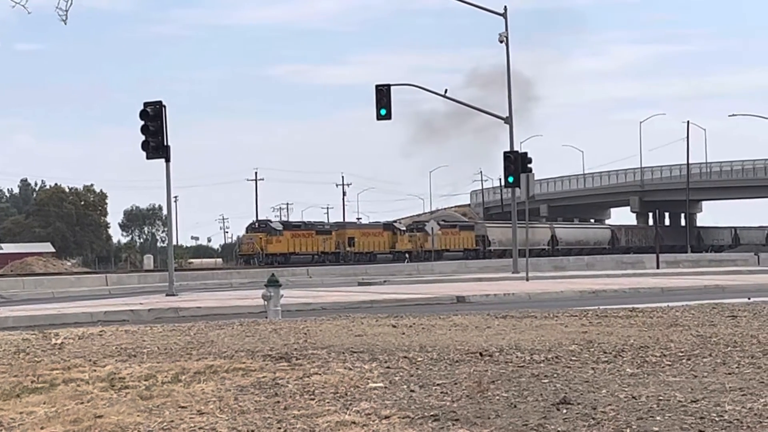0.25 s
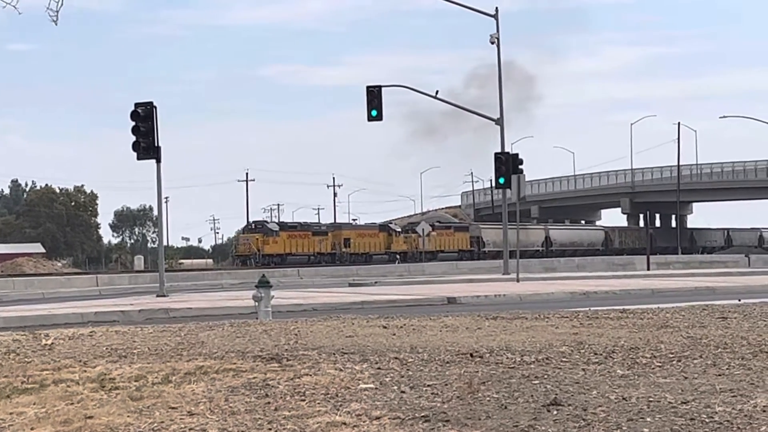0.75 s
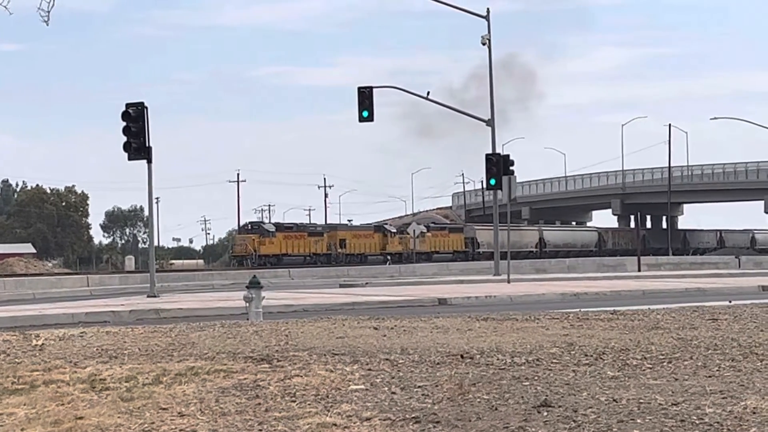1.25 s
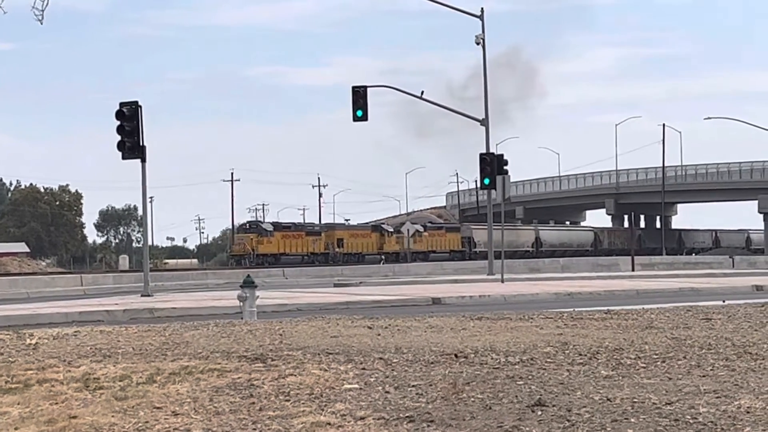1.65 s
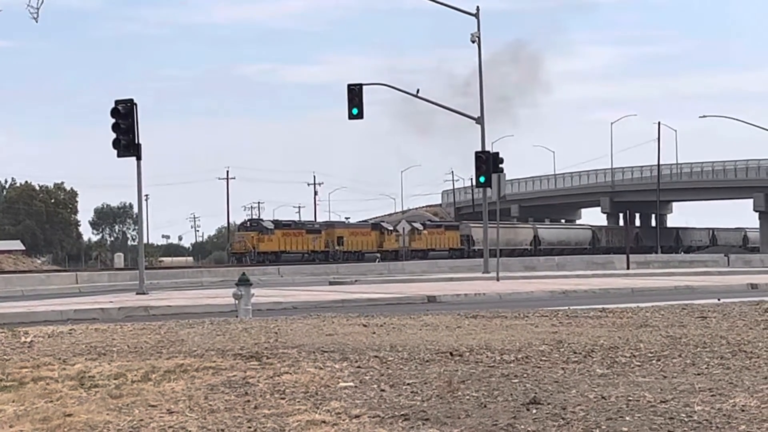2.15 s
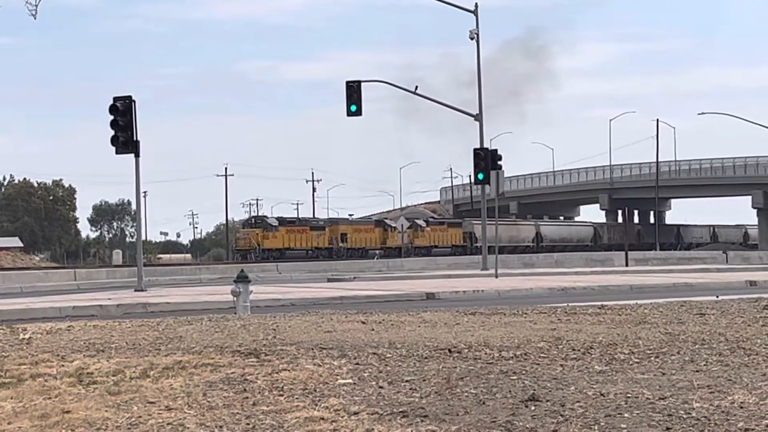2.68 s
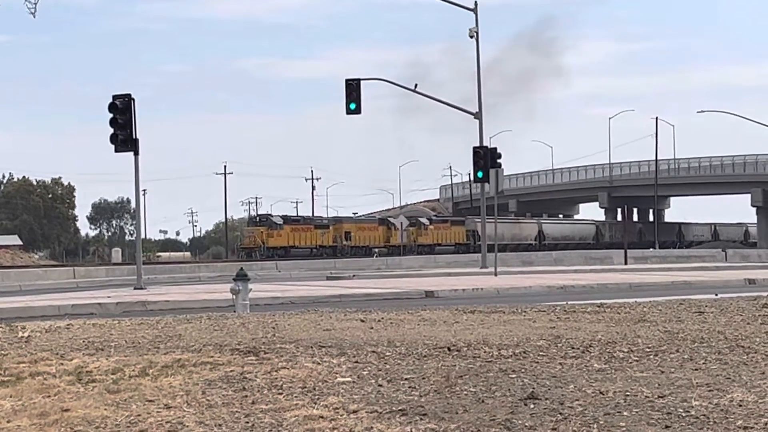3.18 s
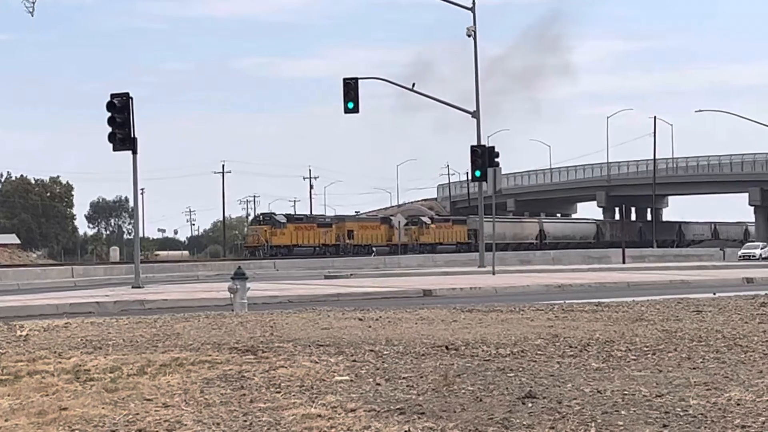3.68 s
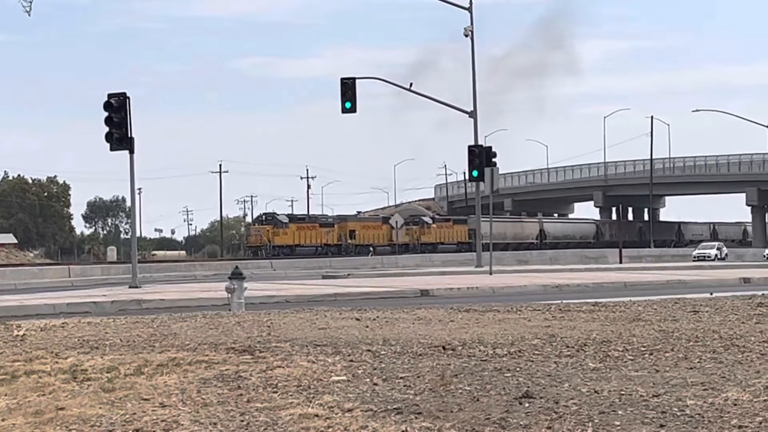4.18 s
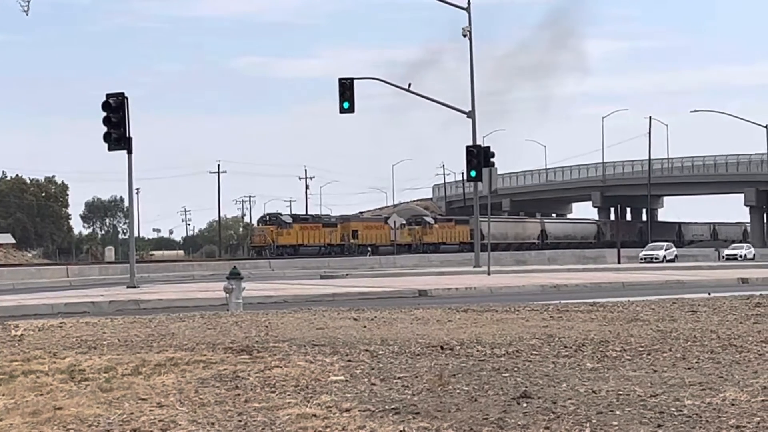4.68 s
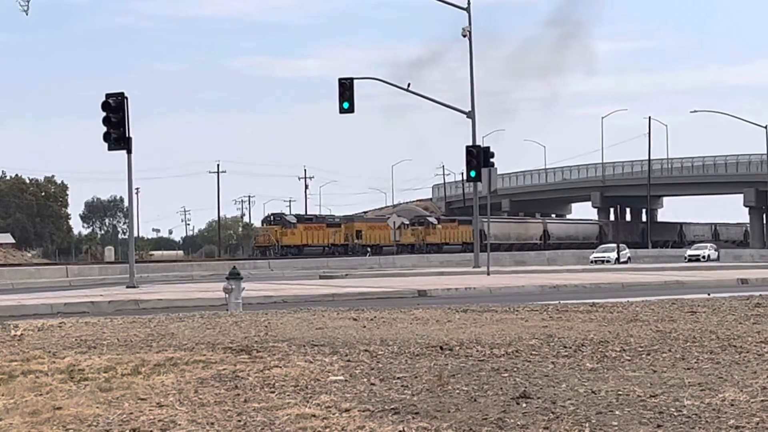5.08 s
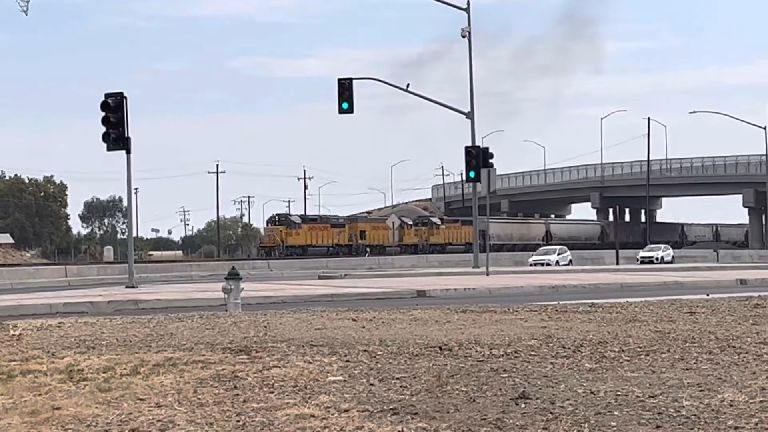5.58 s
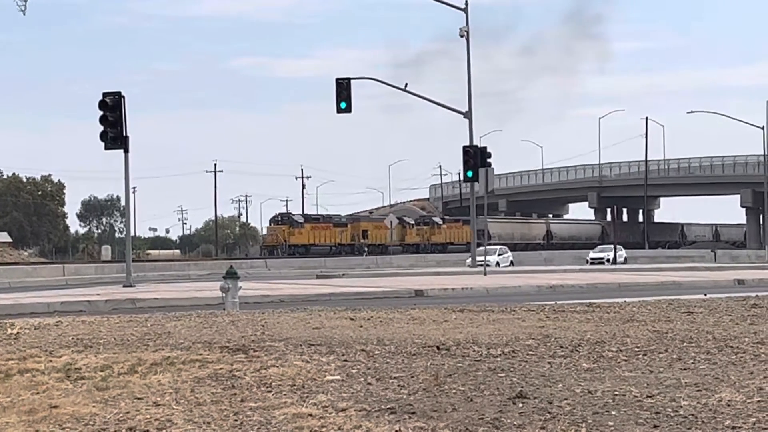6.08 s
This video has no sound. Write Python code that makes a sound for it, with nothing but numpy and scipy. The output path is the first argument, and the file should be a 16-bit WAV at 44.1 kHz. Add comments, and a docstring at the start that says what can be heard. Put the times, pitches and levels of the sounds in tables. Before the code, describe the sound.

Heavy diesel engine rumbling and knocking steadily in open air, slowing and softening midway, then pulling again with a thin whistle and late squeak.

```python
"""A large diesel across a road pulls steadily, its exhaust throbbing once a crank turn and its block clattering.
From the start, noise makes the hiss of passing cars, and blurred tones make hums and whines.
Small ticks ring and dry snaps of noise sound within the first second, and a few more follow.
The engine slows and eases off, thin sliding tones whistle as it picks up again, and a squeak comes near the end.
A small two-port microphone stands in an open field."""
import sys
import numpy as np
from scipy import signal
from scipy.fft import rfft, irfft, next_fast_len
from scipy.io import wavfile
from scipy.ndimage import uniform_filter1d, map_coordinates

SR = 44100
rng = np.random.default_rng(int(sys.argv[2]) if len(sys.argv) > 2 else 0)


def pcm_store(signal):
    """Save signal as 16-bit PCM."""
    levels = np.round(np.clip(np.atleast_2d(signal), -1, 1) * 32767)
    wavfile.write(sys.argv[1], SR, levels.astype(np.int16).T)


N = 279990


def amp(db):
    """Turns a level in dB into a gain."""
    return 10 ** (np.asarray(db) / 20)


def unit(x):
    """Scales a signal to an rms of 1."""
    return x / np.sqrt(np.mean(x ** 2) + 1e-20)


def along(points, hz):
    """Reads a curve of (frequency, value) points, joined on a log frequency axis."""
    f, v = np.transpose(points)
    return np.interp(np.log(hz + 1), np.log(f + 1), v)


def curves(rows):
    """Gives one value per sample for each column after the time."""
    s, *cols = np.transpose(rows)
    return [np.interp(np.arange(N) / SR, s, c) for c in cols]


def wobble(rate):
    """Draws a smooth random curve through `rate` random points a second."""
    points = rng.standard_normal(int(N * rate / SR) + 4)
    return map_coordinates(points, [np.arange(N) * rate / SR])


def filtered(x, response):
    """Filters x by multiplying its spectrum by a complex response."""
    m = next_fast_len(N + 8192)
    spectrum = rfft(x, m) * response(np.fft.rfftfreq(m, 1 / SR))
    return irfft(spectrum, m)[..., :N]


def rush(spectrum, patchy_db, gate=1):
    """Makes stereo noise of rms 1 with patches of random gain, gated before it is coloured."""
    # likeness of left and right: (frequency [Hz], likeness [0-1])
    alike = [(60, .998), (190, .987), (320, .97), (490, .92), (710, .79), (950, .84), (1120, .74),
             (1420, .36), (1600, .2), (1800, .76), (2320, .93), (3200, .97), (3600, .999), (5000, .999),
             (5300, .9), (7500, .85)]
    z = signal.stft(rng.standard_normal((2, N)), nperseg=512)[2]
    field = rng.standard_normal(z.shape[1:])
    field = uniform_filter1d(field, size=5, axis=0)  # smooth over frequency
    field = uniform_filter1d(field, size=12, axis=1)  # smooth over time
    pair = gate * signal.istft(z * amp(patchy_db * unit(field)), nperseg=512)[1][:, :N]

    def mix(hz):
        angle = np.arccos(np.clip(along(alike, hz), -1, 1)) / 2
        return amp(along(spectrum, hz)) * [np.cos(angle), np.sin(angle)]

    mid, side = filtered(pair, mix)
    return unit(np.array([mid + side, mid - side]))


def staged(levels, fade=0):
    """Holds a level through each stage, joins them by ramps and sinks by `fade` dB per s at the end."""
    # pulling, straining, easing off, slack, picking up, settled: (from [s], to [s])
    # the last times run backwards: the settled level cuts in at the very last one, without a ramp
    stages = [(0, 0.82), (1.6, 2.08), (2.4, 3.03), (3.3, 3.52), (4.25, 5.3), (5.15, 5.03)]
    t = np.arange(N) / SR
    held = np.interp(t, np.ravel(stages), np.repeat(levels, 2))
    return held - fade * np.clip(t - stages[-1][1], 0, None)


def window(start, length, edge):
    """Rises, holds and falls; all three settings are in seconds."""
    t = np.arange(N) / SR - start
    return np.clip(np.minimum(t, length - t) / edge, 0, 1) ** 2


def beats(turns, places):
    """Makes short swells at fixed places in the crank turn, a little different every time."""
    total = 0
    for at, db in places:
        swell = np.exp(11 * (np.cos(2 * np.pi * (turns - at)) - 1))
        total = total + amp(db + 1.5 * wobble(11)) * swell
    return total


def exhaust(turns):
    """Adds tones at multiples of the crank speed that bunch up once a turn, which makes the throb."""
    # strong tones: (multiple of the crank speed, then level in each of the six stages [dB])
    strong = [(6, -30, -29.5, -39, -41, -33, -32.5), (7, -36.5, -34.5, -47, -49, -45, -45),
              (8, -36.5, -37.5, -41, -47, -44, -43), (9, -33.5, -30, -36.5, -39, -28.5, -31),
              (10, -31, -32.5, -35.5, -37, -37.5, -33.5), (11, -47, -43, -51, -55, -43, -43),
              (13, -44, -43.5, -50, -57, -50, -49), (15, -38, -50, -34, -45, -56, -56),
              (17, -44, -51, -49, -54, -41.5, -46), (18, -33, -31.5, -43, -43, -46, -42),
              (19, -40, -43, -48, -54, -43, -50)]
    # weak tones: (multiple of the crank speed, multiple it follows, level relative to that one [dB])
    weak = [(3, 6, -20), (12, 11, -3), (16, 17, -6), (20, 18, -13.5), (21, 17, -4.5), (23, 18, -17),
            (24, 18, -20), (25, 18, -19), (26, 18, -21), (28, 18, -22), (29, 18, -15), (30, 18, -19),
            (31, 18, -19), (32, 18, -23), (33, 18, -24), (34, 18, -23), (39, 18, -21), (44, 18, -22)]
    level = {int(round(k)): staged(db, fade=4) for k, *db in strong}
    for k, leader, db in weak:
        level[int(round(k))] = level[int(round(leader))] + db

    out = 0
    for k, db in level.items():
        # the phase rises in steps, and faster for the highest orders,
        # so their burst falls elsewhere in the turn
        phase = .45 + 1.05 * (k - 6) + .95 * (k > 8) + .95 * (k > 18)
        phase += np.pi * (k == 15)  # order 15 runs against the rest
        phase += -.9 * (10 < k < 15) + 1.75 * max(k - 22, 0)
        # moving air makes each order waver; the fainter ones drift further out of step
        drift_size = .2 if db.mean() > -44 else .6
        drift = .014 * k * wobble(7) + drift_size * wobble(1.2)
        gain = np.sqrt(2) * amp(db + .8 * wobble(6))
        out = out + gain * np.cos(2 * np.pi * k * turns + phase + drift)
    return out


def engine():
    """Adds exhaust tones, a low roar, block noise, and noise pulsed by the crank as knocks and clacks."""
    # crank speed: (time [s], speed [turns per s])
    speed = [(0, 11.082), (.32, 11.067), (1.198, 10.849), (2.152, 10.947), (2.678, 10.417), (3.537, 9.071),
             (3.895, 8.966), (5.152, 9.617), (6.35, 9.368)]
    # knocks in the block: (place in the turn [0-1], relative level [dB])
    knock_places = [(.05, -4.5), (.29, -11.5), (.41, -11.5), (0.721, -15), (0.917, -16)]
    # lower, ringing clacks: (place in the turn [0-1], relative level [dB])
    clack_places = [(.38, 0), (.77, -7)]
    # colour of the low roar: (frequency [Hz], relative level [dB])
    roar_colour = [(15, -48), (32, -8), (60, 0.5), (85, -3.5), (110, -2.5), (160, -5), (220, -6),
                   (275, -11), (325, -10), (390, -14), (500, -13.5), (700, -23.5), (1100, -31),
                   (2500, -86.5)]
    # colour of the block's noise: (frequency [Hz], relative level [dB])
    block_colour = [(350, -24), (600, 2.5), (700, -0.5), (790, 2), (1140, -2.5), (1240, -2), (1520, -2),
                    (1840, -4), (2110, -8), (2500, -8.5), (4160, -22), (5670, -29), (7500, -55),
                    (7750, -78)]
    # colour of a clack: (frequency [Hz], relative level [dB])
    clack_colour = [(500, -90), (900, -30), (1160, -15), (1228, 0), (1300, -13), (1450, -13), (1620, -22),
                    (1800, -8), (1920, -8), (2100, -26), (2500, -45), (3500, -120)]
    # colour of a knock: (frequency [Hz], relative level [dB])
    knock_colour = [(900, -5), (1900, -2.5), (2150, -6), (2500, 1.5), (2800, 0.5), (3100, -1), (4200, -5),
                    (5600, -13), (7500, -35.5), (7750, -67)]
    # roar: level in each stage [dB]
    roar_db = [-33, -31, -33.5, -34, -33.5, -33.5]
    # block noise: level in each stage [dB]
    block_db = [-41, -40, -45.5, -48, -47, -46.5]
    # clacks: level in each stage [dB]
    clack_db = [-49, -48.5, -60, -60, -55, -59]
    # strength of the knocks: (time [s], level [dB])
    knock_db = [(0, -45), (.7, -47), (1.2, -46), (1.6, -49.5), (2.1, -52.5), (2.6, -61), (3.5, -63.5),
                (4.3, -50.5), (5, -53), (6.35, -62)]

    turns = np.cumsum(curves(speed)[0]) / SR
    knock_beats = beats(turns, knock_places)
    clack_beats = beats(turns, clack_places)
    roar = amp(staged(roar_db)) * rush(roar_colour, patchy_db=1.18)
    block = amp(staged(block_db)) * rush(block_colour, patchy_db=1.5, gate=1 + 0.62 * knock_beats)
    clacks = amp(staged(clack_db)) * rush(clack_colour, patchy_db=1.5, gate=.12 + clack_beats)
    knocks = amp(curves(knock_db)[0]) * rush(knock_colour, patchy_db=2.0, gate=0.22 + knock_beats)
    return exhaust(turns) + roar + block + clacks + knocks


def road():
    """Makes tyre hiss, an uneven low far rumble and the faint top of the open air from coloured noise."""
    # cars going by: (time of the peak [s], half length [s], level added to the hiss [dB])
    passes = [(0.153, 0.33, -54), (4.556, 0.6, -58.5), (5.59, 0.28, -62)]
    # colour of tyre hiss: (frequency [Hz], relative level [dB])
    hiss_colour = [(410, -30.5), (700, -7.5), (1000, -3), (1590, -18), (1930, -3), (2260, -10.5),
                   (2600, -6.5), (3100, -9.5), (4200, -14.5), (4800, -14.5), (5200, -17.5), (6400, -21),
                   (7550, -19), (7750, -68)]
    # colour of far traffic: (frequency [Hz], relative level [dB])
    rumble_colour = [(15, -19.5), (28, 12), (45, 30.5), (80, 14), (150, 4.5), (260, -36)]
    # colour of the faint top hiss: (frequency [Hz], relative level [dB])
    air_colour = [(8600, -40), (9100, -8.), (9800, 0.), (10500, -10), (11400, -11), (12300, -19),
                  (14400, -35)]
    t = np.arange(N) / SR
    cars = amp(-54)  # hiss between cars
    for s, half, db in passes:
        cars = cars + amp(db) * np.exp(-((t - s) / half) ** 2)
    hiss = cars * amp(0.13 * wobble(9.7)) * rush(hiss_colour, patchy_db=3.0)
    rumble = amp(-44.5 + 2.7 * wobble(1.2)) * rush(rumble_colour, patchy_db=7.5)
    air = amp(-78.5 + 2.1 * wobble(6)) * rush(air_colour, patchy_db=-1.0)
    return hiss + rumble + air


def hums_and_whines():
    """Makes tones blurred by narrow noise, each swelling and fading; some are resonances of the engine."""
    # hums and whines: (frequency [Hz], width [Hz], level at first, midway and at last [dB])
    hums = [(263, 8., -54, -53, -52), (318, 9., -46, -47, -48), (335, 40, -46, -56, -60),
            (356, 6., -56, -54, -54), (430, 6., -54, -54, -57), (476, 4., -57, -55, -50),
            (645, 12, -58, -62, -62), (955, 20, -60, -57, -66), (1228, 30, -55, -61, -58),
            (1850, 110, -57, -66, -64), (2490, 110, -56, -65, -62), (2670, 25, -72, -68, -72),
            (3140, 25, -72, -69, -73), (3740, 40, -76, -75, -68), (4760, 300, -68, -66, -65),
            (5650, 70, -88, -82, -88), (6215, 60, -88, -83, -82), (6750, 250, -78, -78, -74)]
    out, t = np.zeros(N), np.arange(N) / SR
    for hz, width, *db in hums:
        blur = 4 / width + wobble(width) + 1j * wobble(width)  # the wider, the less pure tone
        tone = unit(np.real(blur * np.exp(2j * np.pi * hz * t)))
        level = np.interp(t, np.linspace(0, N / SR, len(db)), db)
        out += amp(level + 0.8 * wobble(1.5)) * tone
    return out


def ticks():
    """Makes each tick or clink as a short, slightly rough ring with a soft start."""
    # ticks: (time [s], frequency [Hz], peak level before roughening [dB], 60 dB decay [s], rise [s])
    clinks = [(.488, 9700, -65, .08, .008), (.482, 11220, -68, .15, .012), (.495, 12700, -74, .1, .005),
              (.528, 6900, -58, .07, .005), (.535, 11220, -69, .12, .008), (.535, 12700, -73, .2, .008),
              (.624, 11850, -68, .08, .004), (1.575, 1360, -38, .15, .008), (1.82, 2350, -45, .1, .005),
              (1.915, 2400, -45, .1, .005), (5.108, 6800, -58, .03, .002), (5.268, 6750, -62, .04, .003),
              (5.403, 6700, -57, .035, .002), (5.603, 4750, -53, .03, .002)]
    out, t = np.zeros(N + SR), np.arange(SR // 4) / SR
    for s, hz, db, t60, rise in clinks:
        slow_noise = np.convolve(rng.standard_normal(len(t)), np.hanning(60), "same")
        rough = 1 + 0.7 * unit(slow_noise)
        shape = amp(-60 * t / t60) * (1 - np.exp(-t / rise)) ** 2
        ring = shape / shape.max() * rough * np.sin(2 * np.pi * hz * t)
        out[round(s * SR):][:len(t)] += amp(db) * ring
    return out[:N]


def snaps():
    """Makes sudden bright noise that starts at full strength and quickly dies away."""
    # dry snaps in the top treble: (time [s], relative starting level [dB], 60 dB decay [s])
    bursts = [(.625, -65, .05), (1.942, -76, .015), (3.7, -74, .02)]
    # colour of a snap: (frequency [Hz], relative level [dB])
    snap_colour = [(7000, -90), (8600, -40), (9300, 0), (13800, -2), (14400, -20)]
    t = np.arange(N) / SR
    strength = sum((t > s) * amp(db - 60 * np.abs(t - s) / t60) for s, db, t60 in bursts)
    return strength * rush(snap_colour, patchy_db=0)


def whistle():
    """Makes thin notes from a sliding sine and its octave, and a short squeak from two unsteady sines."""
    # notes: (time [s], length [s], first pitch [Hz], pitch it slides towards [Hz],
    #         level [dB], octave level relative to the note [dB])
    notes = [(3.58, .06, 2790, 2850, -58, -30), (3.64, .26, 2900, 3025, -57, -30),
             (3.63, .09, 2940, 2955, -76, 8.), (3.91, .2, 3030, 3050, -54.5, -28),
             (4.12, .11, 3070, 3075, -74, 7.), (4.21, .16, 3090, 2620, -55, -24),
             (4.36, .09, 2480, 2450, -55.5, -30), (4.78, .6, 1270, 1230, -59, -6),
             (5.93, .16, 2350, 2490, -58, -30)]
    # the squeak: (time [s], length [s], rise and fall [s], level [dB])
    squeak_shape = (5.85, .3, .06, -60)
    # tones in the squeak: (frequency [Hz], relative level [dB])
    squeak_tones = [(2430, -6.), (3745, -9.)]
    glide_s, edge_s = 0.2, 0.011  # time a full slide takes, soft start and stop; short notes end mid-slide
    t, tone = np.arange(N) / SR, 0
    for s, length, first_hz, last_hz, db, octave_db in notes:
        pitch = np.interp(t, [s, s + glide_s], [first_hz, last_hz]) + 12 * wobble(50)
        phase = 2 * np.pi * np.cumsum(pitch) / SR
        gain = window(s, length, edge_s) * amp(db + 2.0 * wobble(40))
        tone = tone + gain * (np.sin(phase) + amp(octave_db) * np.sin(2 * phase))

    squeak = 0
    for hz, db in squeak_tones:
        phase = 2 * np.pi * np.cumsum(hz + 9 * wobble(35)) / SR
        squeak = squeak + amp(db + 2.8 * wobble(25)) * np.sin(phase)
    squeak = amp(squeak_shape[3]) * window(*squeak_shape[:3]) * squeak
    return np.sqrt(2) * (tone + squeak)


def scene():
    """Adds up all sources in open air."""
    return engine() + road() + hums_and_whines() + ticks() + snaps() + whistle()


def record(dry):
    """The recorder's body shades one port and shifts its phase; nothing is kept above the band limit."""
    # level balance: (frequency [Hz], left minus right [dB])
    lean = [(100, -.3), (190, -1.6), (320, -1.7), (490, -.6), (950, -1.1), (1200, -2.5), (1800, -5.6),
            (2320, -2.7), (3500, 0)]
    # phase balance: (frequency [Hz], angle by which left leads [radians])
    lead = [(100, -.09), (190, -.12), (400, .08), (1120, -.1), (1450, 1.3), (1800, -.5), (2320, .25),
            (3200, .15), (3600, 0), (5000, 0), (5700, -.9), (6900, -1.3), (8100, -3.1), (10000, -4.5),
            (11200, -6.2)]
    top_hz = 14450
    side = np.array([[.5], [-.5]])  # half of each difference goes to each port

    def ports(hz):
        shade = amp(side * along(lean, hz))
        shift = np.exp(1j * side * along(lead, hz))
        return shade * shift * (hz < top_hz)

    return filtered(dry, ports)


dry = scene()
out = record(dry)
pcm_store(out)
```